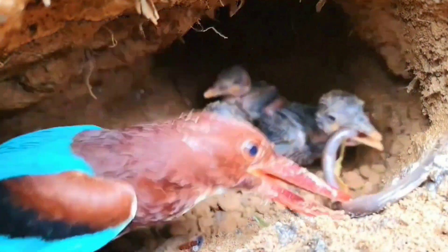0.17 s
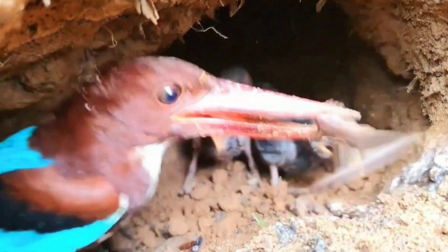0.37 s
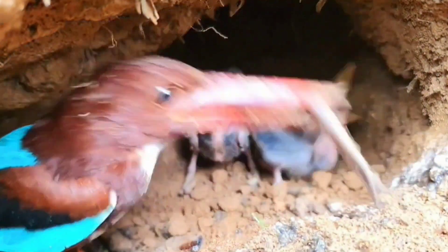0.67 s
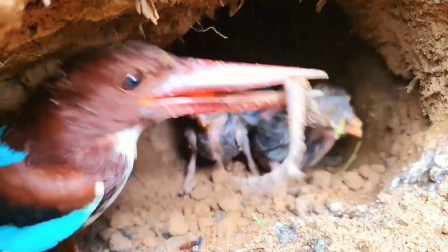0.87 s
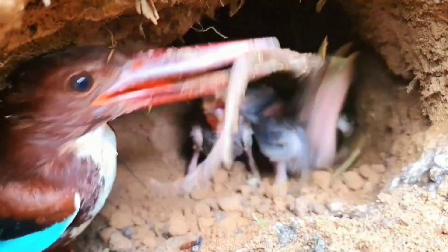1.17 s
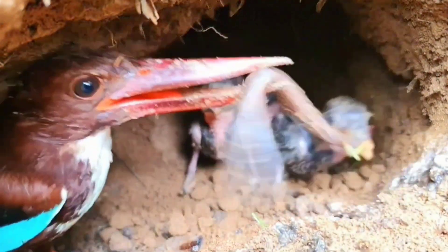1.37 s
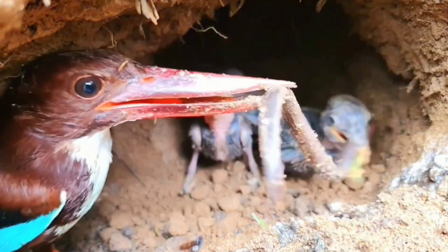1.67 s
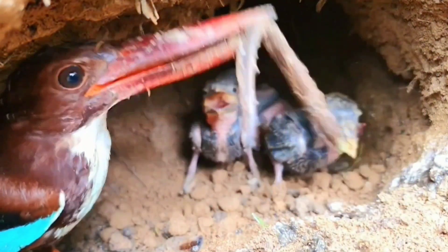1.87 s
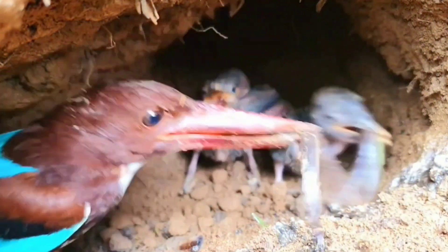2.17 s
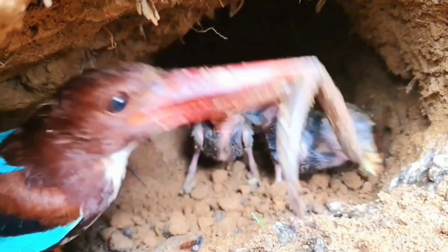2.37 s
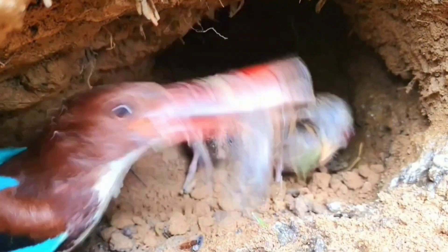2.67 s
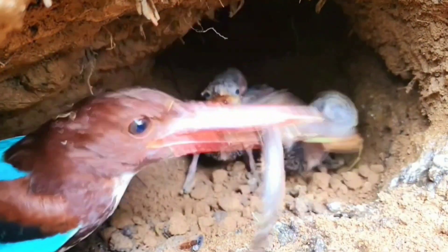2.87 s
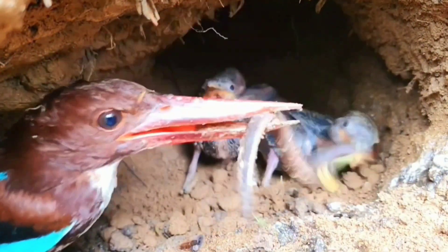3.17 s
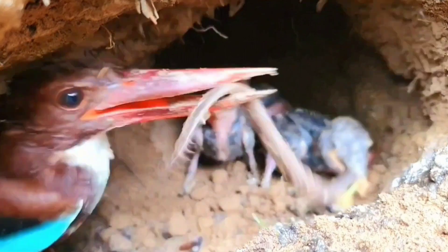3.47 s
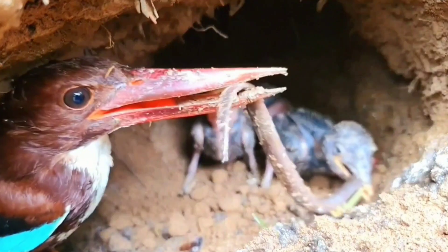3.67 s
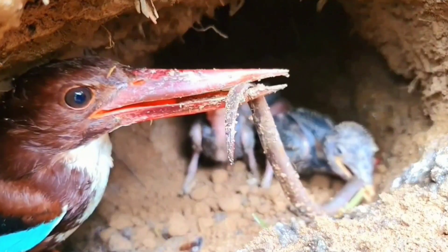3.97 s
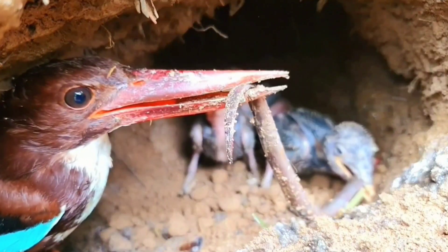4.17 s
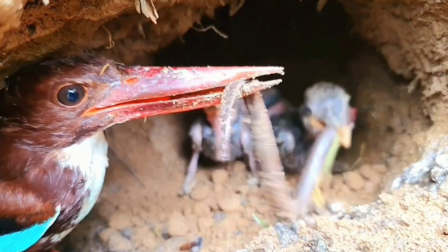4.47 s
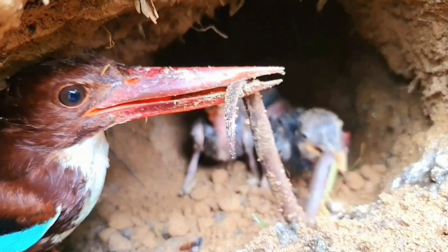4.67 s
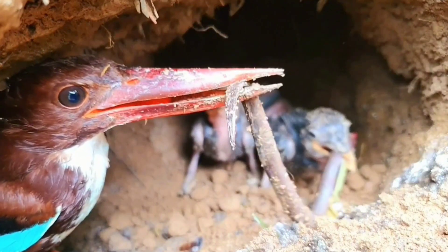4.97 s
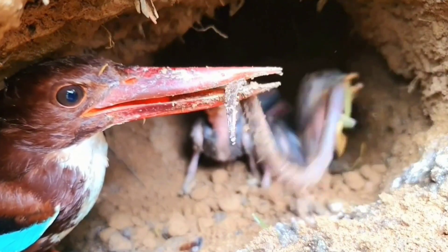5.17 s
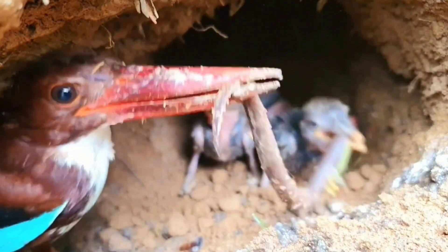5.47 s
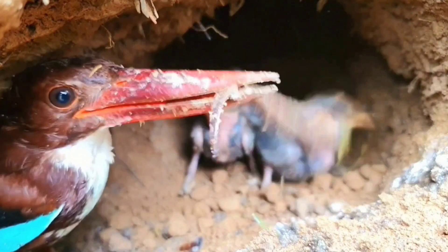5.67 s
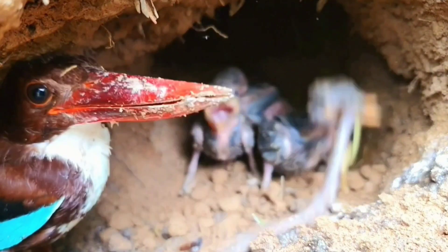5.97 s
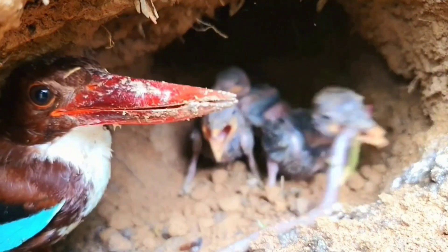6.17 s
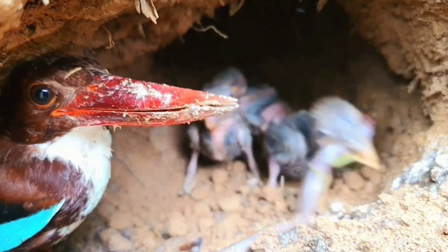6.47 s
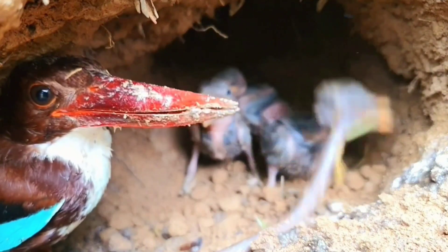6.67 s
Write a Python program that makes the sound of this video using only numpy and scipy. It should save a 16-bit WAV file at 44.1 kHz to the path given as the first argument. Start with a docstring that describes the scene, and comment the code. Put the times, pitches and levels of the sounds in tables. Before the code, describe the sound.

A fast, nearly unbroken buzz of high, raspy chick whistles in a soil nest hole, with drawn-out squeals, dull knocks and faint outdoor hiss.

```python
"""Nestlings beg close by in an earth burrow: short hoarse whistles about ten a second, some drawn out into rasping
squeals. Each call is a wavering whistle tone plus bursts of noise ringing resonances; one squeal cracks into a croak.
Underneath lie thumps of prey handed over by a parent and a soil rustle as the birds shuffle (shaped noise),
rumble and hiss from outside (filtered noise) and faint insects (narrow noise bands)."""
import sys
import numpy as np
from scipy import signal
from scipy.fft import rfft, irfft
from scipy.io import wavfile
from scipy.ndimage import uniform_filter1d, minimum_filter1d

SR = 44100
rng = np.random.default_rng(int(sys.argv[2]) if len(sys.argv) > 2 else 0)


def unload_audio(sound):
    """Save the sound as a 16-bit wav file, at the path given as the first command line argument."""
    columns = np.transpose(np.atleast_2d(sound))
    # keep every value between -1 and 1, then stretch to whole-number steps
    steps = np.round(np.clip(columns, -1, 1) * 32767)
    wavfile.write(sys.argv[1], SR, steps.astype(np.int16))


N = 300321
TIME = np.arange(N) / SR
TYPICAL_RASP_DB = -24  # reference for how air and fizz follow the rasp


def gain_of(db):
    """Amplitude factor of a level in dB."""
    return 10 ** (np.asarray(db) / 20)


def evened(x):
    """Scales to unit RMS."""
    return x / np.sqrt(np.mean(abs(x) ** 2) + 1e-20)


def smooth(x, corner_hz):
    """Two one-pole low-passes in a row."""
    pole = np.exp(-2 * np.pi * corner_hz / SR)
    return signal.lfilter([(1 - pole) ** 2], [1, -2 * pole, pole * pole], x)


def complex_noise(n):
    """White noise in both real and imaginary parts."""
    return rng.standard_normal(n) + 1j * rng.standard_normal(n)


def wander(rate_hz):
    """Unit-RMS complex noise that changes about rate_hz times a second."""
    return evened(smooth(complex_noise(N), rate_hz))


def fade(db):
    """Gain along a dB track, its corners rounded."""
    return smooth(gain_of(db), 470)


def warble(pitch_hz, envelope):
    """A carrier along a pitch track, shaped by a complex envelope."""
    carrier = np.exp(2j * np.pi * np.cumsum(pitch_hz) / SR)
    return np.sqrt(2) * (envelope * carrier).real


def ring(drive, modes, stretch=1):
    """Noise through steep resonances, scaled by stretch; each drifts in phase and slightly in strength."""
    out = 0
    clock_s = np.cumsum(stretch * np.ones(N)) / SR
    for mode_hz, width_hz, db in modes:
        turn = np.exp(2j * np.pi * mode_hz * clock_s)
        drift = wander(14.2)
        band = smooth(drive / turn, width_hz)  # shifted to 0 Hz, filtered, shifted back
        out = out + gain_of(db) * (turn * band * drift / abs(drift) ** 0.93).real
    return evened(out)


def outside():
    """Steady rumble and hiss as shaped noise; insect song as narrow bands of noise."""
    # outside air spectrum, relative: freq_hz, density_db
    air_spectrum = [(20, -20), (55, 0), (110, -3.5), (150, -10.5), (250, -16.5), (450, -33), (800, -31),
                    (2000, -24.5), (3500, -16), (6000, -42), (10000, -25.5), (16000, -39)]
    # insect bands: center_hz, width_hz, level_db
    insects = [(4690, 71, -48.5), (11500, 150, -67)]
    freq_hz, density_db = np.transpose(air_spectrum)
    bin_hz = np.fft.rfftfreq(N, 1 / SR)
    shape_db = np.interp(np.log(bin_hz + 1), np.log(freq_hz), density_db)
    wash = irfft(rfft(rng.standard_normal(N)) * gain_of(shape_db), N)
    song = 0
    for center_hz, width_hz, db in insects:
        song = song + gain_of(db) * (wander(width_hz) * np.exp(2j * np.pi * center_hz * TIME)).real
    return gain_of(-48) * evened(wash) + song


def shuffle():
    """Birds shuffle on the soil: lumpy noise rings two low resonances."""
    # rustle level: time_s, level_db
    rustle_levels = [(0.0, -41.5), (0.17, -46.5), (1.71, -48.5), (2.6, -56.5), (2.65, -42), (2.98, -62),
                     (3.03, -45.5), (4.15, -56), (6.81, -49.5)]
    time_s, level_db = np.transpose(rustle_levels)
    lumpy = rng.standard_normal(N) * abs(wander(22.5)) ** .5
    rustle = ring(lumpy, [(139.0, 28.6, 2.5), (355, 135, -7.0)])  # mode_hz, width_hz, relative dB
    return gain_of(np.interp(TIME, time_s, level_db)) * rustle


def knocks():
    """Prey thumps and random scuffs on loose soil as decaying noise bands; a grain of soil ticks."""
    # soft thumps: start_s, level_db (before a 4 dB lift), center_hz
    thumps = [(0.537, -35.5, 427), (0.791, -37.5, 279), (1.442, -34, 408), (1.522, -41, 490),
              (1.724, -33, 437), (2.081, -33.5, 333.5), (2.66, -32, 580), (2.765, -37, 350)]
    # soil grain tick: start_s, level_db
    grit = [(.2473, -30)]
    out = np.zeros(N + 4000)
    t = np.arange(4000) / SR
    scuffs = rng.random((40, 3)) * [N / SR, 8, 300] + [0, -52, 220]  # same columns as thumps
    for start_s, db, center_hz in [*thumps, *scuffs]:
        puff = (smooth(complex_noise(len(t)), 93) * np.exp(2j * np.pi * center_hz * t)).real
        decay = gain_of(db + 4 - 60 * t / .07)  # 60 dB in 70 ms
        attack = np.minimum(t / .003, 1)
        out[round(start_s * SR):][:len(t)] += decay * attack * evened(puff)
    for start_s, db in grit:
        tick = np.diff(rng.standard_normal(len(t) + 2), 2) / 2  # treble-heavy noise
        out[round(start_s * SR):][:len(t)] += gain_of(db - 60 * t / 0.013) * tick
    return out[:N]


def burrow(x):
    """A very short earthy tail: sparse random taps that decay 60 dB in 68 ms."""
    t = np.arange(3000) / SR
    taps = rng.choice([-1., 1.], len(t)) * (rng.random(len(t)) < .1) * gain_of(-60 * t / 0.068)
    return signal.oaconvolve(x, taps / np.linalg.norm(taps))[:N]


def croak():
    """A squeal cracks: a rough low band swells, with a faint, brief 11.7 kHz noise band on top."""
    # croak and high band: time_s, croak_db, croak_hz, high_band_db
    crack = [(0.09, -34, 2490, -45), (0.111, -30, 2453, -39), (0.126, -9.5, 2396, -46),
             (0.144, -17, 2500, -24), (0.18, -40, 2500, -60)]
    time_s, croak_db, croak_hz, high_band_db = np.transpose(crack)
    inside = (TIME >= time_s[0]) & (TIME < time_s[-1])
    low_track_db = np.where(inside, np.interp(TIME, time_s, croak_db), -120)
    high_track_db = np.where(inside, np.interp(TIME, time_s, high_band_db), -120)
    low = fade(low_track_db) * warble(np.interp(TIME, time_s, croak_hz), wander(160))
    return low + fade(high_track_db) * warble(np.full(N, 11700), wander(300))


def note(start_s, lag_s, length_s, whistle_db, whistle_hz, rasp_db):
    """A short note, its effort topping early, as (times, values) of whistle, Hz, rasp, gape, fizz, air."""
    # whistle shape: share of its length, offset_db, bend_hz
    whistle_arch = [(0, -16, -85), (.045, -1, 0), (.25, -2.5, 60.5), (.7, 0.9, 0), (.9, -1.5, -55),
                    (1, -16.5, -100)]
    # turbulence over rasp_db, in dB, at: air start, whistle start, effort peak, just before end, end
    rasp_swell = [-26, -15.5, 1.5, -17, -13]
    gape_swell = [-38, -22, -11.5, -23, -15]
    fizz_swell = [-64, -18.5, -3.5, -18, -40]
    # airflow over air_db, in dB, at: start, pop, dip, effort peak, just before end, end
    air_swell = [-2, 3, -6.5, 2, -2, -4]
    pop_s, close_s, edge_db = 0.0032, 0.0061, -22
    whistle_s, peak_s, end_s = start_s + lag_s, start_s + 0.39 * length_s, start_s + length_s
    share, arch_db, bend_hz = np.transpose(whistle_arch)
    arch_s = whistle_s + (end_s - 0.011 - whistle_s) * share  # the whistle stops 11 ms before the air
    whistle_times = [start_s, *arch_s, end_s]
    swell_times = [start_s, whistle_s, peak_s, end_s - close_s, end_s]
    air_times = [start_s, start_s + pop_s, start_s + 2 * pop_s, peak_s, end_s - close_s, end_s]
    air_db = -35 + 0.31 * (rasp_db - TYPICAL_RASP_DB)  # airflow follows the rasp only a little
    return [(whistle_times, whistle_db + np.array([edge_db, *arch_db, edge_db])),
            (whistle_times, whistle_hz + np.pad(bend_hz, 1, "edge")),
            (swell_times, rasp_db + np.array(rasp_swell)),
            (swell_times, rasp_db + np.array(gape_swell)),
            (swell_times, rasp_db + np.array(fizz_swell)),
            (air_times, air_db + np.array(air_swell))]


def squeal(rows):
    """A drawn-out note as the same six tracks, ending in a quick release."""
    time_s, whistle_db, pitch_hz, rasp_db, gape_db, air_db = np.transpose([*rows, rows[-1]])
    release = np.arange(len(time_s)) == len(rows)  # true at the added last point
    drop_db = -20.5 * release
    times = time_s + 0.012 * release
    fizz_db = -31.5 + 0.52 * (rasp_db - TYPICAL_RASP_DB)  # fizz follows the rasp by about half
    return [(times, whistle_db + drop_db), (times, pitch_hz), (times, rasp_db + drop_db),
            (times, gape_db + drop_db), (times, fizz_db + drop_db), (times, air_db + drop_db)]


def controls():
    """Tracks of whistle dB, Hz and rasp, gape, fizz, air dB; where calls overlap the louder counts."""
    # short notes: air_start_s, whistle_lag_s, length_s, whistle_db, whistle_hz, rasp_db
    notes = [(0.274, 0.0086, .072, -17.5, 2980, -17.5), (0.603, 0.0074, 0.069, -11.5, 2916, -19.5),
             (.706, .010, 0.066, -12, 2915, -21), (0.788, .013, .065, -14, 2915, -22),
             (0.887, 0.011, 0.067, -15.5, 2940, -24.5), (.972, 0.0076, .062, -14.5, 2875, -21.5),
             (1.071, .013, 0.067, -9.5, 2915, -23.5), (1.172, 0.0045, 0.066, -9.5, 2940, -26.5),
             (1.459, .012, 0.08, -13, 2916, -21.5), (1.573, 0.0033, .059, -11, 2886, -22),
             (1.667, 0.0092, 0.079, -14, 2895, -25), (1.731, 0.0013, 0.088, -13, 2880, -26.5),
             (1.801, .004, 0.076, -10.5, 2940, -22.5), (1.909, 0.0096, 0.064, -9, 2906, -20),
             (2.016, .011, 0.064, -9.5, 2944, -23), (2.107, .005, 0.057, -10, 2913, -21.5),
             (2.203, .007, 0.064, -11, 2910, -23.5), (2.302, .009, 0.061, -10.5, 2924, -20),
             (2.394, .008, 0.069, -9.5, 2920, -23), (2.495, .003, 0.065, -10, 2914, -27),
             (2.554, 0.0036, 0.1, -15, 2920, -27.5), (2.635, .008, 0.076, -14, 2890, -24.5),
             (2.821, 0.0093, 0.075, -16.5, 2920, -18.5), (2.891, 0.0057, 0.076, -12, 2886, -20.5),
             (2.997, 0.013, .072, -17.5, 2975, -18), (3.322, 0.0092, 0.072, -10, 2914, -22.5),
             (3.425, .002, 0.059, -11.5, 2910, -22.5), (3.513, .011, .093, -11, 2920, -23),
             (3.587, .014, 0.09, -12.5, 2896, -24), (3.687, 0.0025, 0.065, -12, 2900, -22),
             (3.791, 0.0082, .067, -11, 2905, -24), (3.891, .008, .070, -13, 2934, -24.5),
             (3.989, 0.0042, 0.061, -7.5, 2927, -23), (4.089, 0.0084, 0.08, -12, 2927, -25.5),
             (4.202, 0.0098, 0.066, -11.5, 2886, -25), (4.305, 0.0025, 0.061, -10, 2903, -24.5),
             (4.402, 0.014, 0.07, -12, 2890, -24.5), (4.509, 0.0089, 0.083, -10, 2924, -26.5),
             (4.618, 0.0049, 0.062, -11.5, 2880, -24), (4.716, 0.0098, 0.066, -7, 2912, -26.5),
             (4.821, 0.013, 0.068, -7.5, 2924, -26), (4.925, .009, 0.074, -13.5, 2944, -25),
             (5.032, 0.012, 0.074, -10, 2886, -24), (5.138, .010, 0.077, -12.5, 2903, -26),
             (5.246, .012, .075, -10.5, 2913, -26), (5.332, 0.011, .069, -9, 2880, -23),
             (5.43, 0.0029, 0.094, -10, 2890, -26), (5.511, 0.0092, 0.079, -11, 2900, -26),
             (5.595, 0.014, 0.081, -13, 2890, -23), (5.716, .010, 0.069, -10, 2892, -24),
             (5.817, 0.0086, 0.079, -13.5, 2970, -23), (6.143, .007, 0.075, -16, 2955, -21),
             (6.249, 0.0089, 0.074, -12, 2933, -22), (6.354, 0.013, .070, -11, 2880, -21),
             (6.453, .008, .075, -18, 2990, -24), (6.789, 0.016, .070, -10, 2950, -19.5)]
    # squeals, one curve each: time_s, whistle_db, whistle_hz, rasp_db, gape_db, air_db
    squeals = [
        [(0, -13.5, 2890, -26.5, -22, -28.5), (.058, -12.5, 2900, -20.5, -37, -28.5),
         (.118, -18, 2720, -18.5, -34, -28), (.164, -7.5, 2743, -23, -29, -25.5),
         (.178, -17, 2780, -18, -37, -37), (.205, -10, 2860, -20, -32, -18.5)],
        [(.33, -22.5, 3000, -20, -36, -48), (.378, -24, 2934, -21.5, -33, -27), (.52, -21, 2960, -19, -31, -29),
         (.538, -10.5, 2930, -25.5, -28.5, -27.5)],
        [(1.228, -15, 2980, -38.5, -55, -37), (1.29, -13, 3000, -29, -55, -36),
         (1.342, -16.5, 3000, -24.5, -40, -34.5), (1.434, -10.5, 2910, -27.5, -38, -28.5),
         (1.456, -30.5, 2920, -38, -37, -33.5), (1.525, -25, 2880, -27, -37, -28)],
        [(2.705, -15, 2890, -44, -53, -34), (2.736, -21.5, 2880, -18.5, -28.5, -35.5),
         (2.77, -17, 2870, -26, -18, -27.5)],
        [(3.062, -14.5, 2950, -29, -40, -38), (3.111, -16, 2975, -25.5, -42, -26.5),
         (3.162, -19.5, 2950, -20, -36, -30), (3.187, -11, 2910, -38, -46, -28.5),
         (3.219, -19, 2970, -20, -40, -25.5), (3.257, -10.5, 2950, -25, -33, -25),
         (3.27, -21, 2930, -24.5, -23, -22.5)],
        [(5.885, -11, 2930, -42.5, -48, -30), (5.923, -25, 2916, -22, -41, -30.5),
         (5.937, -10.5, 2953, -33, -39, -35), (5.991, -27.5, 3020, -21.5, -35, -31),
         (6.045, -25.5, 2960, -20, -19.5, -32), (6.093, -22, 2910, -19, -27, -28)],
        [(6.518, -10, 2930, -25, -32, -38), (6.536, -32.5, 2890, -24.5, -28, -32),
         (6.616, -25, 2910, -21, -23.5, -27), (6.724, -18, 2930, -20, -36, -22),
         (6.738, -17.5, 2950, -36, -22.5, -25)],
    ]
    tracks = np.full((6, N), -120.)
    tracks[1] = 2900  # Hz
    for call in [note(*row) for row in notes] + [squeal(rows) for rows in squeals]:
        times = call[0][0]
        span = slice(round(times[0] * SR), round(times[-1] * SR))
        new = np.array([np.interp(TIME[span], *track) for track in call])
        old = tracks[:, span]
        pitch_hz = np.where(new[0] > old[0], new[1], old[1])
        tracks[:, span] = np.maximum(new, old)
        tracks[1, span] = pitch_hz
    return tracks


def chicks():
    """A wavering whistle over chaotic flutter of the syrinx; the windpipe resonances move with the pitch."""
    # resonances (air: windpipe and burrow): mode_hz, width_hz, relative level_db
    air_modes = [(558, 136, -4), (771.5, 78, 6.5), (1011, 124, 8.5), (1293, 60, 0), (1687, 54, 7.5),
                 (1989, 100, 11.5), (2287, 87, 7), (2720, 48, 14), (5184, 210, 4.5)]
    rasp_modes = [(3220, 160, -7.5), (3480, 55, -2), (3655, 159, -0.5)]
    gape_modes = [(3850, 150, -2), (4404, 300, 3.5), (4690, 430, 0)]
    fizz_modes = [(6620, 460, -4.5), (7344, 320, 1.5), (7853, 132, 5.5), (7983, 410, 1), (9120, 190, -5),
                  (10050, 550, -8), (11700, 480, -14.5), (12730, 1600, -15.5), (14600, 3000, -26)]
    whistle_db, pitch_hz, rasp_db, gape_db, fizz_db, air_db = controls()
    # a strong rasp breaks up the whistle
    rough = np.clip(smooth((rasp_db - whistle_db + 23.0) / 16, 54), .05, 1)
    body = np.sqrt(1 - rough) * wander(46.0) + np.sqrt(rough) * wander(111.4)
    size = abs(body) + 1e-9
    # a self-driven tone cannot swell far but slips in phase
    body = evened(body / size * np.tanh(size / 1.8))
    flaps = (rng.random(N) < 2500 / SR) * rng.standard_normal(N)  # irregular membrane snaps, 2500 a second
    drive = evened(flaps) + 2.2 * rng.standard_normal(N)
    drive = drive * abs(wander(65)) ** 0.27  # uneven bursts
    stretch = (pitch_hz / 2930) ** .3
    voice = fade(whistle_db) * warble(pitch_hz, body)
    layers = (rasp_db, rasp_modes), (gape_db, gape_modes), (fizz_db, fizz_modes), (air_db, air_modes)
    for db, modes in layers:
        voice = voice + fade(db) * ring(drive, modes, stretch)
    return voice


def scene():
    """Voices with their burrow tail over the background; the two channels differ only slightly."""
    voice = chicks() + croak()
    mid = voice + gain_of(-15) * burrow(voice) + knocks() + shuffle() + outside()
    side = gain_of(-47.0) * burrow(mid)
    return np.array([mid + side, mid - side])


def record(dry):
    """A quick limiter holds peaks above 0.8; then a low-pass at 15480 Hz."""
    peak = uniform_filter1d(-minimum_filter1d(-abs(dry).max(0), size=121), size=61)
    held = dry / np.maximum(peak / .8, 1) ** .8
    low_pass = signal.firwin(511, 15480, window=("kaiser", 9), fs=SR)
    return signal.oaconvolve(held, low_pass[None], "same")


dry = scene()
out = record(dry)
unload_audio(out)
```